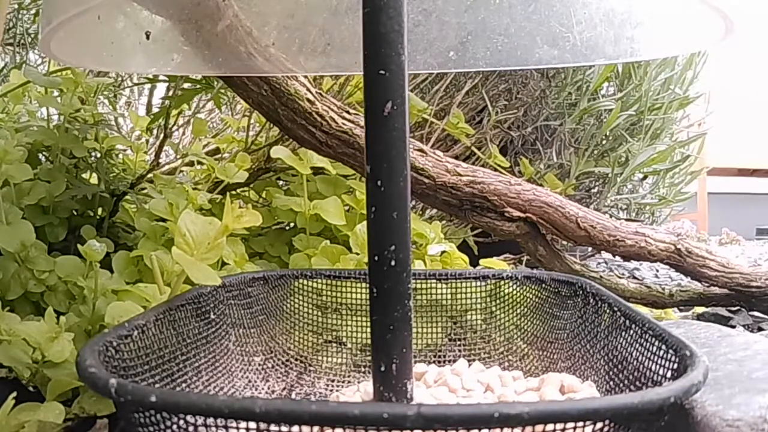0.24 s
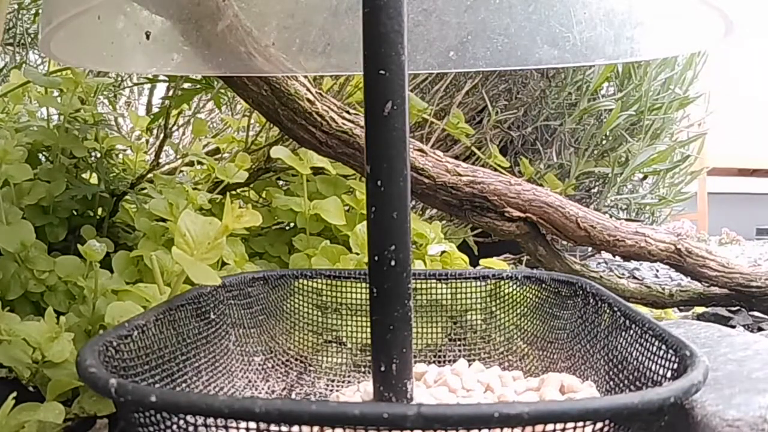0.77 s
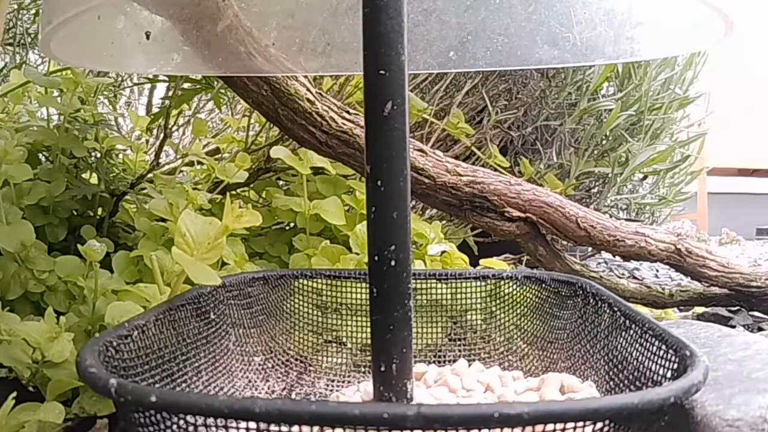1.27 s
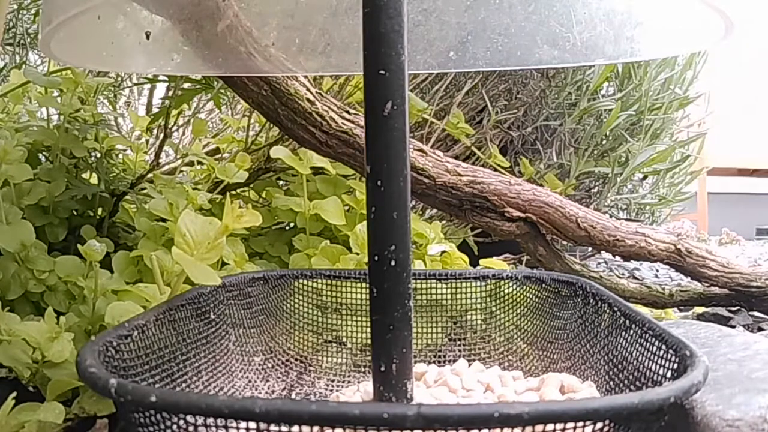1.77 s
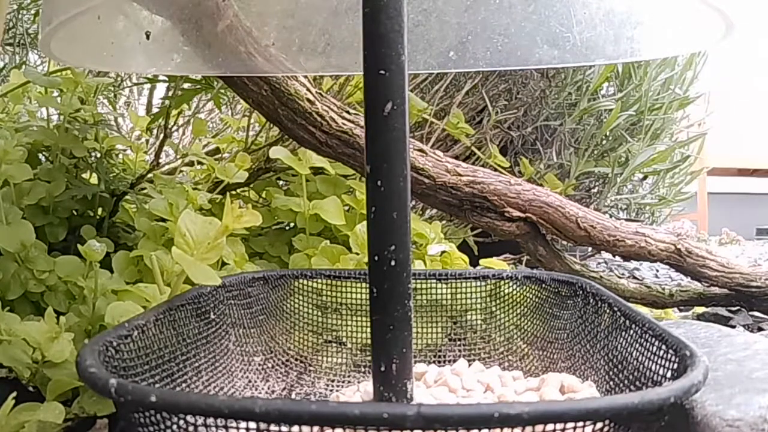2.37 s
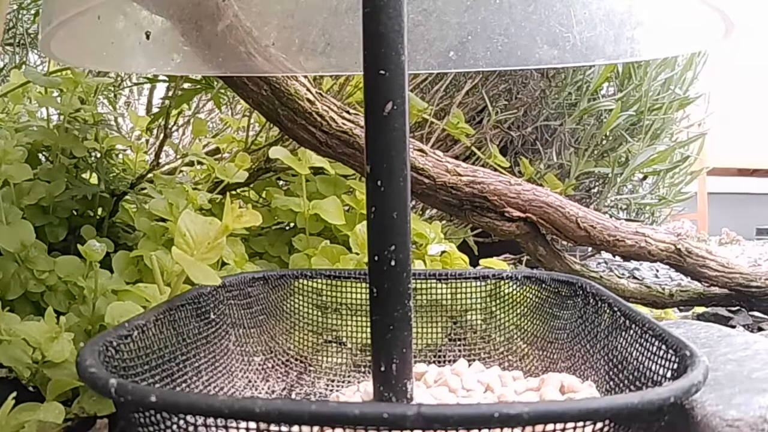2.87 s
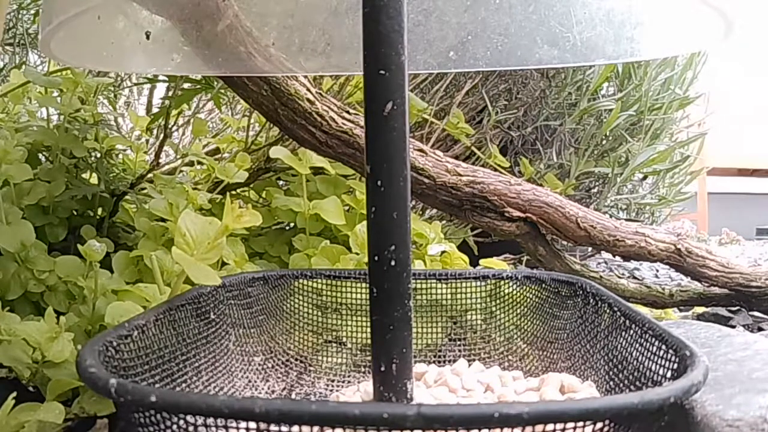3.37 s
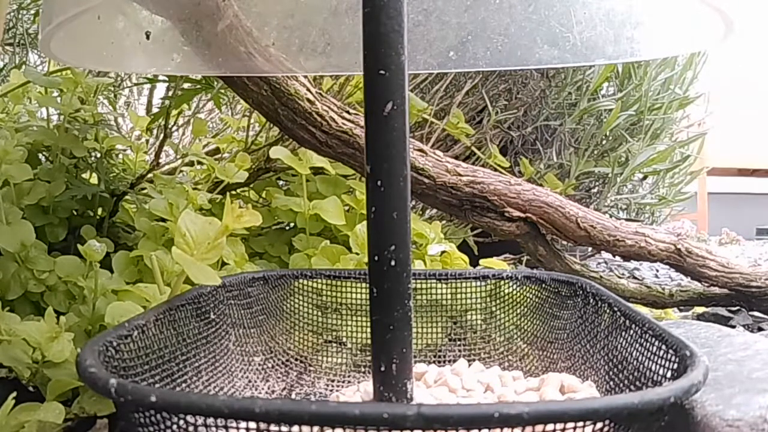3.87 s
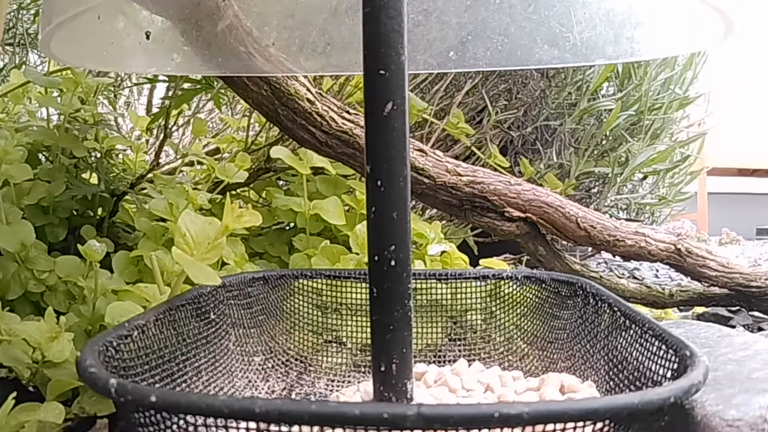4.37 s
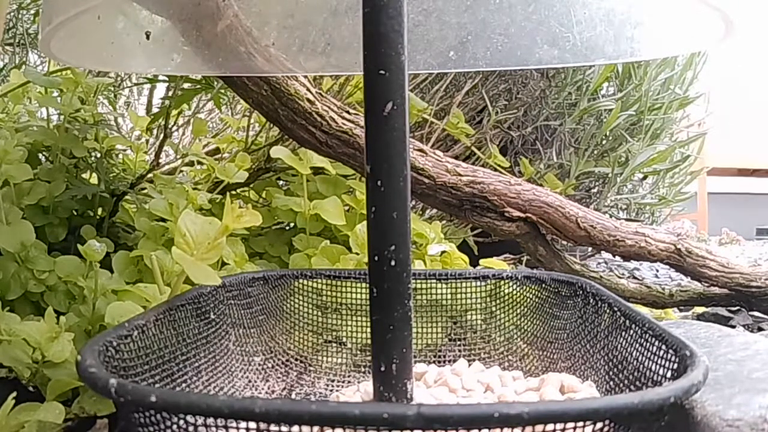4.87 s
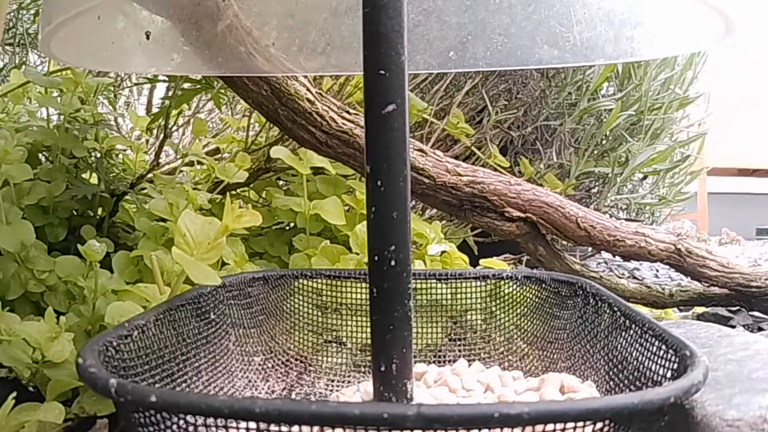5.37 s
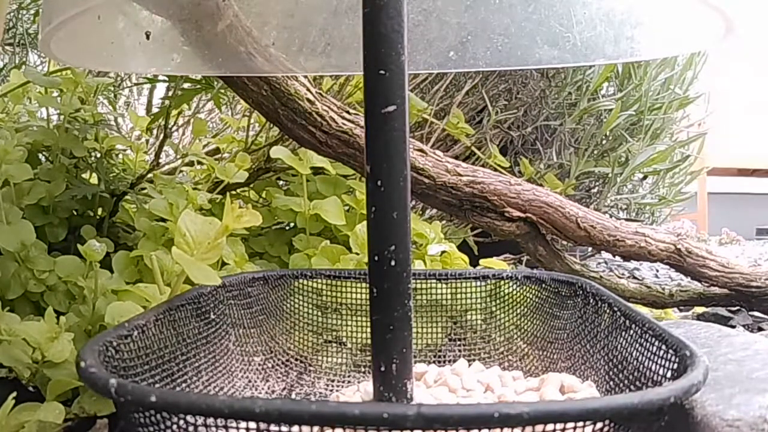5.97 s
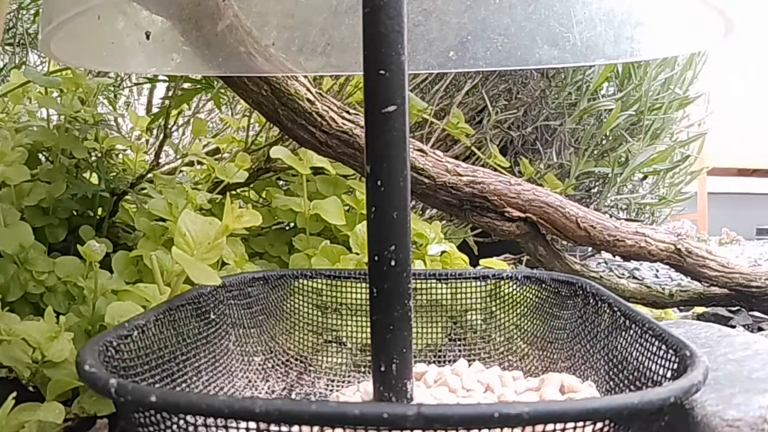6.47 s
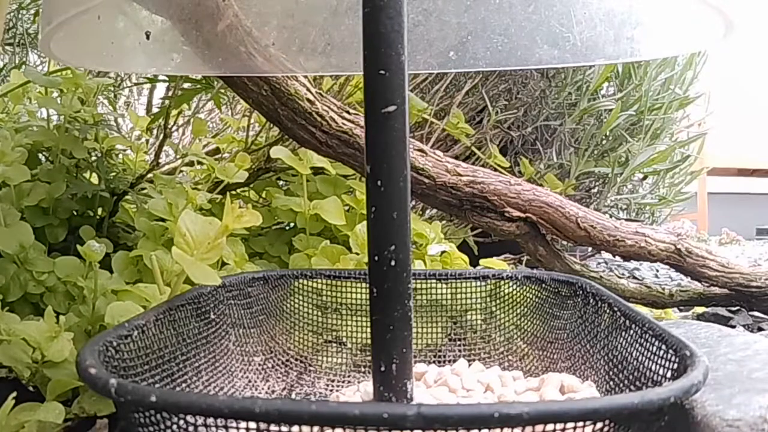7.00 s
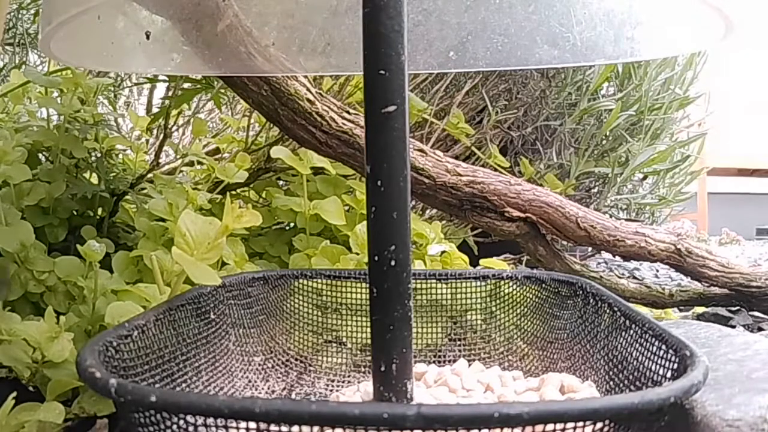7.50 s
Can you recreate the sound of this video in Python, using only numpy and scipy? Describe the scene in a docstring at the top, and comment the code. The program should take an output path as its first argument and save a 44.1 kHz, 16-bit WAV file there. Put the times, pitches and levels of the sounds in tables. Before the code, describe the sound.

In a quiet garden, an animal, probably a dog, gives three separate falling whines about two seconds apart. The first is a thin, piercing whistle that roughens at its end; the two after it are much lower, trembling and cracking with brief rasps. Faint peeps and tiny ticks appear between them over a soft low rumble of distant traffic. The calls sound fairly clear, with only a trace of outdoor echo.

```python
"""Animal whining in a quiet garden

An animal, probably a dog, whines three times, each call sliding down: first a thin whistle, then two calls
over an octave lower. Summed partials pass through throat resonances; now and then a second oscillator
sounds along, or noise rasps in a break. Gliding sines peep faintly, noise bursts tick, one pulse clicks.
Shaped noise makes far traffic and still air; a short tail and one echo place the calls in the garden."""
import sys
import numpy as np
from scipy import signal
from scipy.fft import rfft, irfft
from scipy.io import wavfile

SR = 44100
rng = np.random.default_rng(int(sys.argv[2]) if len(sys.argv) > 2 else 0)


def waveform_to_disk(signal):
    """Save audio, clipped to [-1, 1], as 16-bit WAV at the path in sys.argv[1]."""
    frames = np.transpose(np.atleast_2d(signal))
    scaled = np.clip(frames, -1, 1) * 32767
    samples = np.round(scaled).astype(np.int16)
    wavfile.write(sys.argv[1], SR, samples)


N = 341334
TIME = np.arange(N) / SR


def amp(db):
    """Decibels to linear gain."""
    return 10 ** (np.asarray(db) / 20)


def evened(x):
    """Scale to an rms of 1."""
    return x / np.sqrt(np.mean(x ** 2) + 1e-20)


def wander(hz):
    """Smooth random drift of rms 1 that moves up to about hz times a second."""
    f = np.fft.rfftfreq(N, 1 / SR)
    spectrum = rfft(rng.standard_normal(N)) / (1 + (f / hz) ** 2)
    return evened(irfft(spectrum, N))


def bump(start, length):
    """One smooth swell from zero to one and back."""
    return np.sin(np.pi * np.clip((TIME - start) / length, 0, 1))


def gate(times, fade):
    """Open from the first time to the last, with a straight fade at each edge."""
    return np.clip(np.minimum(TIME - times[0], times[-1] - TIME) / fade, 0, 1)


def glide(start, length, start_hz, end_hz):
    """Pitch that runs in a straight line from one frequency to another."""
    return np.interp(TIME, [start, start + length], [start_hz, end_hz])


def phase_of(hz):
    """Add up a changing frequency into an oscillator's phase."""
    return 2 * np.pi * np.cumsum(hz) / SR


def band(x, low_hz, high_hz, order=4):
    """Keep the sound between two frequencies."""
    edges = [low_hz, min(high_hz, SR / 2 - 1)]
    return signal.sosfilt(signal.butter(order, edges, "band", fs=SR, output="sos"), x)


# spectrum of far traffic and still air: (frequency [Hz], relative density [dB per Hz])
AIR_SPECTRUM = [(15, -11.5), (50, -1), (114, -8.5), (173, -11.5), (339, -17), (560, -21.5), (1190, -27),
                (2610, -34.5), (5100, -39), (8800, -45), (10000, -55.5), (11200, -48.5), (13200, -58.5),
                (14200, -67.5)]
AIR_DB = -55.5  # rms before the swell


def air():
    """Noise that rumbles low, thins out toward the treble and swells a little, over a deep drone."""
    hz, db = np.transpose(AIR_SPECTRUM)
    f = np.fft.rfftfreq(N, 1 / SR)
    colour = amp(np.interp(np.log(f + 1), np.log(hz + 1), db))
    noise = irfft(rfft(rng.standard_normal(N)) * colour, N)
    swell = amp(.35 * wander(1.5))
    drone = amp(-68.0) * evened(band(rng.standard_normal(N), 44, 57))
    return amp(AIR_DB) * evened(noise) * swell + drone


TICKS_PER_S, TICK_DB, TICK_S = 2.2, -81.5, 0.016  # average rate, noise rms at the top of a tick, length


def ticks():
    """Tiny bursts of narrow treble noise at random moments."""
    starts = amp(TICK_DB) * (rng.random(N) < TICKS_PER_S / SR)
    level = signal.oaconvolve(starts, bump(0, TICK_S)[TIME < TICK_S])[:N]
    return level * evened(band(rng.standard_normal(N), 10500, 11000))


# resonances of the throat: (centre [Hz], width [Hz], gain [dB])
THROAT = [(1061, 530, -6), (1347, 90, -11.5), (2090, 583, 2.5), (3170, 580, -6), (4050, 285, 7.5),
          (4775, 700, 3), (8700, 290, -12), (9430, 450, -2.5)]


def throat(hz):
    """Gain of the throat at a frequency; a partial flares as it slides through a resonance."""
    power = 0
    for centre, width, db in THROAT:
        power = power + amp(db) ** 2 / (1 + (2 * (hz - centre) / width) ** 2) ** (3 / 2)
    return np.sqrt(power)


# breaks in the voice: (middle [s], length [s], level change [dB], pitch jump [share], shake [0-1],
# change of partials 3 and 4 [dB], rasp [dB])
BREAKS = [(0.685, 0.047, -8, 0.016, 0.2, -3, -80), (0.779, 0.071, -5.5, 0.017, .03, -12, -73),
          (0.955, 0.038, -1.5, -0.0092, .05, -3, -80), (1.139, .05, -6.5, -.012, 0.2, 0, -77),
          (3.37, 0.038, 3.5, 0.0031, 0.08, -8, -82), (3.617, 0.076, -2.5, -.012, 0.33, -2, -52.5),
          (3.676, 0.069, -0.5, .008, 0.17, 9.5, -64), (3.708, 0.041, -1.5, -.016, 0.25, 8.5, -67),
          (3.738, .04, 0.5, .008, .2, 5, -72), (3.787, 0.064, 2, -0.01, 0.33, 7, -70),
          (3.883, 0.082, 4.5, -0.028, 0.39, -7, -65), (5.224, 0.018, -2, 0.031, 0.3, 3, -80),
          (5.405, 0.2, -1.5, 0.0073, 0.39, 9, -81), (5.473, .045, 0, 0.16, 0.1, -11, -80),
          (5.499, 0.061, -10, 0, .1, -7, -77), (5.544, 0.094, 5.5, 0.012, 0.24, 4, -65),
          (5.743, 0.071, -10.5, 0.085, 0.87, -8, -53)]


def breaks():
    """How far the voice shifts in level (dB), jumps in pitch, shakes and brightens (dB) at each moment."""
    spells = np.array([bump(middle - length / 2, length) for middle, length, *_ in BREAKS])
    _, _, level_db, jump, shake, upper_db, _ = np.transpose(BREAKS)
    return level_db @ spells ** 2, jump @ spells ** 2, shake @ spells, upper_db @ spells


ATTACK_S, RELEASE_S = 0.034, 0.015  # every call swells in and cuts off
SCOOP_S, DROP_S = 0.025, .027  # pace of the slide onto the pitch, and of the drop as the air runs out
UPPER_FLICKER_DB = 1.8  # the weak upper partials come and go


def call(rows, partials_db, scoop, drop, waver, jitter, shimmer_db):
    """A nearly clean, trembling tone of vocal-fold partials, shaped by the throat; gives sound and phase."""
    times, *columns = np.transpose(rows)
    hz, effort_db, *odd = [np.interp(TIME, times, column) for column in columns]
    odd_db = odd[0] if odd else 0
    since, left = np.maximum(TIME - times[0], 0), np.maximum(times[-1] - TIME, 0)
    break_db, jump, shake, upper_db = breaks()
    hz = hz * (1 - scoop * np.exp(-(since / SCOOP_S) ** 2))
    hz = hz * (1 - drop * np.exp(-left / DROP_S)) * (1 + jump)
    tremble = waver * wander(43.4) + (jitter + 0.044 * shake) * wander(340)
    phase = phase_of(hz * (1 + tremble))
    partials = []
    for k, db in enumerate(partials_db, 1):
        level_db = db + odd_db * (k % 2) + 0.64 * wander(33)
        if k > 2:
            level_db = level_db + upper_db + UPPER_FLICKER_DB * wander(12)
        partials.append(amp(level_db) * throat(k * hz) * np.cos(k * phase))
    partials[1] = partials[1] * (1 + shake * wander(130))  # the octave flutters in a break
    envelope = np.minimum(np.minimum(since / ATTACK_S, left / RELEASE_S), 1)
    loudness = amp(effort_db + break_db + shimmer_db * wander(56))
    return sum(partials) * envelope * loudness, phase


# the thin first call: (time [s], pitch before scoop, drop and breaks [Hz], effort [dB])
SQUEAL = [(0.545, 4460, -60), (0.607, 4390, -38.5), (0.637, 3900, -35.5), (0.709, 3420, -40.5),
          (0.822, 3015, -40), (0.86, 3030, -39.5), (0.98, 2726, -42.5), (1.07, 2662, -41.4),
          (1.2, 2447, -49.5), (1.255, 2424, -49), (1.264, 2312, -48.5), (1.404, 2343, -45.5),
          (1.47, 2084, -47), (1.615, 2203, -43)]
# strength of partials 1 to 4 at the vocal folds: [dB]
SQUEAL_PARTIALS = [0.5, -10.5, -30.5, -31]


def squeal():
    """The thin whistle starts above its pitch, slides down onto it and drops at the end."""
    return call(SQUEAL, SQUEAL_PARTIALS, scoop=-.08, drop=0.48, waver=0.0042, jitter=0.0006, shimmer_db=1.36)


# faint peeps during, between and after the calls:
# (start [s], length [s], start [Hz], end [Hz], level [dB])
PEEPS = [(0.651, 0.055, 2520, 2440, -68), (1.738, 0.056, 3850, 3890, -76), (1.874, 0.057, 3650, 3880, -68),
         (3.988, 0.06, 4350, 3730, -70.5), (5.958, 0.07, 2980, 2500, -75), (6.017, 0.068, 2410, 2640, -74),
         (6.219, 0.073, 2730, 2420, -70), (7.129, 0.13, 2760, 2600, -72.5)]


def peeps():
    """Short sine glides, fuzzy and warbling in pitch, barely above the air."""
    fuzz = 1 + .025 * wander(300) + .02 * wander(35)
    sound = np.zeros(N)
    for start, length, start_hz, end_hz, db in PEEPS:
        tone = np.sqrt(2) * np.sin(phase_of(fuzz * glide(start, length, start_hz, end_hz)))
        sound += amp(db) * bump(start, length) * tone
    return sound


RASP_SHARE = 0.75  # part of a break that rasps


def rasps():
    """Chaotic vibration mid-break: noise rings a throat resonance, with a weak skirt around it."""
    level = np.zeros(N)
    for middle, length, *_, db in BREAKS:
        rasp_s = RASP_SHARE * length
        level += amp(db) * bump(middle - rasp_s / 2, rasp_s) ** 2
    ring = evened(band(rng.standard_normal(N), 1850, 2560, order=2))
    skirt = amp(-14) * evened(band(rng.standard_normal(N), 1000, 4000))
    return level * (ring + skirt)


# one sharp click as the squeal steps down: (time [s], peak [dB])
CLICK = (1.2595, -43)


def click():
    """A single pulse through a wide band-pass."""
    time, peak_db = CLICK
    pulse = 1. * (np.arange(N) == round(time * SR))
    sound = band(pulse, 1760, 9700, order=2)
    return amp(peak_db) * sound / abs(sound).max()


def second_voice(hz, level, main_phase, mix, mix_db):
    """A second oscillator shares the airflow with the first, which adds sum and difference tones."""
    on = level > 1e-9
    phase = phase_of(hz[on])
    tone = np.zeros(N)
    for (main, second), db in zip(mix, mix_db):
        tone[on] += amp(db) * np.cos(main * main_phase[on] + second * phase)
    return tone * level


# the low voice that joins the end of the squeal and roughens it: (time [s], pitch before wavering [Hz])
UNDERTONE = [(1.368, 1450), (1.397, 1390), (1.43, 1130), (1.458, 1089), (1.49, 1390), (1.53, 1330),
             (1.563, 1100)]
# tones that squeal and undertone make together: (squeal [multiple], undertone [multiple])
UNDERTONE_MIX = [(0, 1), (1, 1), (2, -1), (1, -1), (2, 1), (2, -2), (3, -1), (1, .5), (1, -.5)]
# strength of each of those tones: [dB]
UNDERTONE_MIX_LEVELS = [0, 1.5, 1.5, -2.5, -10.5, -2, -8.5, -10, -8]


def undertone(squeal_phase, unsteady):
    """The low voice holds one level between its fades; its wavering pitch sags, recovers and falls again."""
    times, hz = np.transpose(UNDERTONE)
    hz = np.interp(TIME, times, hz) * unsteady * (1 + 0.022 * wander(70))
    level = amp(-65) * gate(times, fade=0.0099)
    return second_voice(hz, level, squeal_phase, UNDERTONE_MIX, UNDERTONE_MIX_LEVELS)


# the two low calls: (time [s], pitch before scoop, drop and breaks [Hz], effort [dB], odd partials [dB]);
# without its odd partials the voice flips up an octave
WHINE = [(3.035, 1394, -53, -6), (3.075, 1415, -49.5, 5.5), (3.13, 1415, -44.5, -5),
         (3.222, 1359, -44.5, -3), (3.301, 1240, -53.5, 1), (3.46, 1125, -50.5, 0),
         (3.577, 1103, -44.5, -2.2), (3.632, 1042, -54.5, 3), (3.671, 1046, -45.5, -2.5),
         (3.735, 1016, -48.5, -1.5), (3.794, 927, -56.5, -21), (3.855, 922, -45.5, -7.5),
         (3.914, 924, -58.5, -3)]
LAST_WHINE = [(5.105, 1400, -41.5, -19), (5.139, 1392, -49.5, 0.5), (5.21, 1419, -43, -0.7),
              (5.301, 1368, -43.5, -3), (5.37, 1223, -49.5, -2.5), (5.449, 1179, -53.5, 4),
              (5.515, 1118, -53, -3), (5.594, 1113, -53, 8), (5.629, 1040, -46.5, 6),
              (5.705, 1046, -54.5, 7), (5.78, 993, -56, 10), (5.84, 993, -46, -1.5), (5.934, 996, -45, -14)]
# strength of partials 1 to 4 at the vocal folds: [dB]
WHINE_PARTIALS = [1, 1, -9, -29.5]
LAST_WHINE_PARTIALS = [1, -1, -18, -37]


def whines():
    """Two low calls scoop up to their pitch and drop at the end; gives sound and phase."""
    whine, whine_phase = call(WHINE, WHINE_PARTIALS, scoop=.28, drop=.16,
                              waver=0.0031, jitter=0.0034, shimmer_db=1.0)
    last, last_phase = call(LAST_WHINE, LAST_WHINE_PARTIALS, scoop=.28, drop=.35,
                            waver=0.00303, jitter=0.004, shimmer_db=1.5)
    return whine + last, np.where(TIME < LAST_WHINE[0][0], whine_phase, last_phase)


# a high whistle that comes and goes over the low calls:
# (start [s], length [s], start [Hz], end [Hz], relative level [dB])
WHISTLES = [(3.044, 0.039, 2180, 2560, -68), (3.246, 0.066, 2640, 2430, -62),
            (3.596, 0.056, 2390, 2190, -60), (3.873, 0.043, 2036, 1915, -63),
            (5.114, 0.0213, 2216, 2465, -53), (5.129, 0.1, 2584, 2460, -52), (5.34, 0.022, 2690, 2720, -52),
            (5.367, 0.027, 2260, 2425, -56), (5.392, 0.042, 2520, 2630, -62),
            (5.505, 0.037, 2340, 2020, -61), (5.588, 0.029, 2315, 2620, -60.5),
            (5.718, 0.0307, 2444, 2690, -56.5), (5.738, .03, 2290, 2160, -75)]
# tones that whine and whistle make together: (whine [multiple], whistle [multiple])
WHISTLE_MIX = [(0, 1), (1, 1), (0, 2)]
# strength of each of those tones: [dB]
WHISTLE_MIX_LEVELS = [0, -10, -18]


def whistles(whine_phase, unsteady):
    """Each whistle is one glide, made unsteady, under one swell."""
    sound = np.zeros(N)
    for start, length, start_hz, end_hz, db in WHISTLES:
        hz = glide(start, length, start_hz, end_hz) * unsteady
        level = amp(db) * bump(start, length)
        sound += second_voice(hz, level, whine_phase, WHISTLE_MIX, WHISTLE_MIX_LEVELS)
    return sound


def animal():
    """Three calls, with their second voices and rasping breaks."""
    high_call, squeal_phase = squeal()
    low_calls, whine_phase = whines()
    # the second oscillator is the less steady one, in pitch and in level
    unsteady, flutter = 1 + .012 * wander(250), 1 + .25 * wander(180)
    second = (undertone(squeal_phase, unsteady) + whistles(whine_phase, unsteady)) * flutter
    return np.sqrt(2) * (high_call + low_calls + second) + rasps()


def garden(x, t60=0.28, scatter_db=-28, wall_s=0.067, wall_db=-41):
    """Leaves and fences scatter a short tail; a far wall returns one weak echo."""
    t = TIME[:SR // 2]
    tail = rng.standard_normal(len(t)) * amp(-60 * t / t60) * (t > .003)
    response = amp(scatter_db) * tail / np.linalg.norm(tail)
    response[round(wall_s * SR)] += amp(wall_db)
    return x + signal.fftconvolve(x, response)[:N]


def scene():
    """The animal in the garden, with peeps, ticks, the click and the air added directly."""
    return (garden(animal()) + peeps() + ticks() + click() + air())[None]


def record(dry):
    """A steep low-pass ends the treble at 15500 Hz."""
    low_pass = signal.firwin(511, 15500, window=("kaiser", 9), fs=SR)
    return signal.oaconvolve(dry, low_pass[None], "same")


dry = scene()
out = record(dry)
waveform_to_disk(out)
```